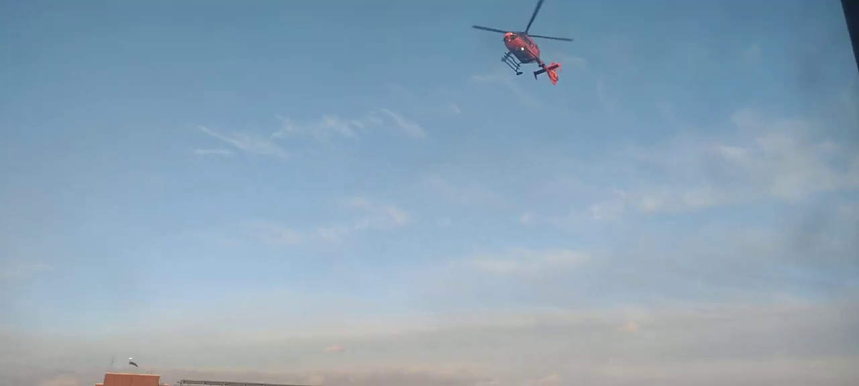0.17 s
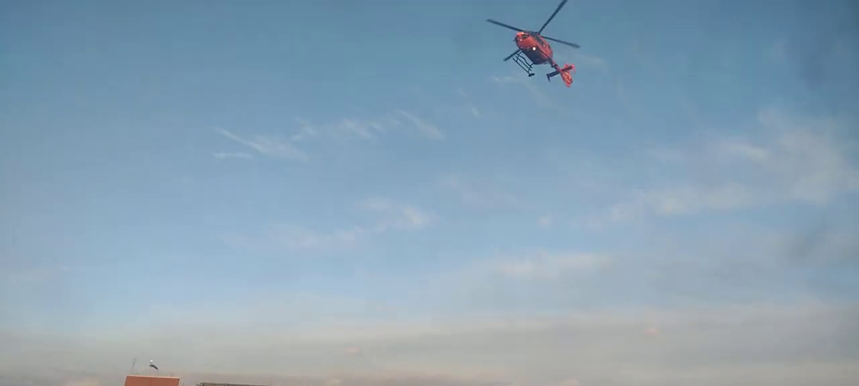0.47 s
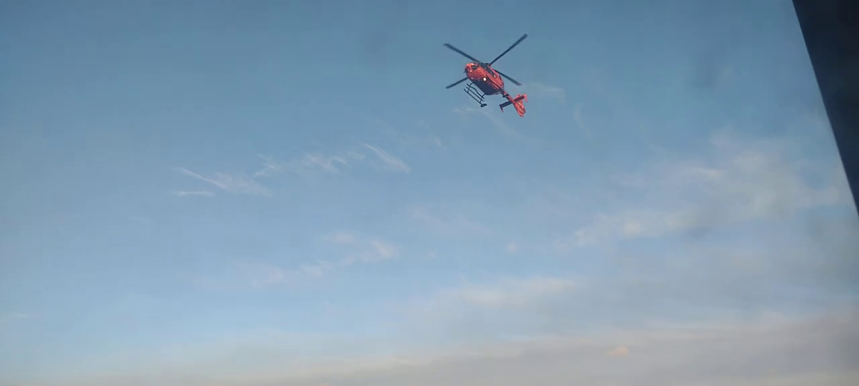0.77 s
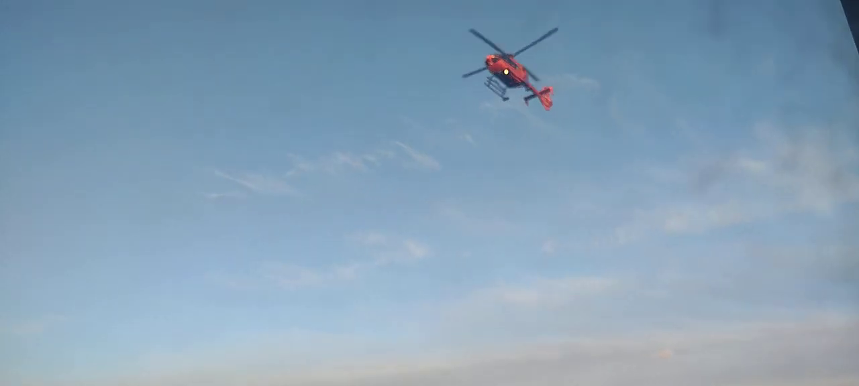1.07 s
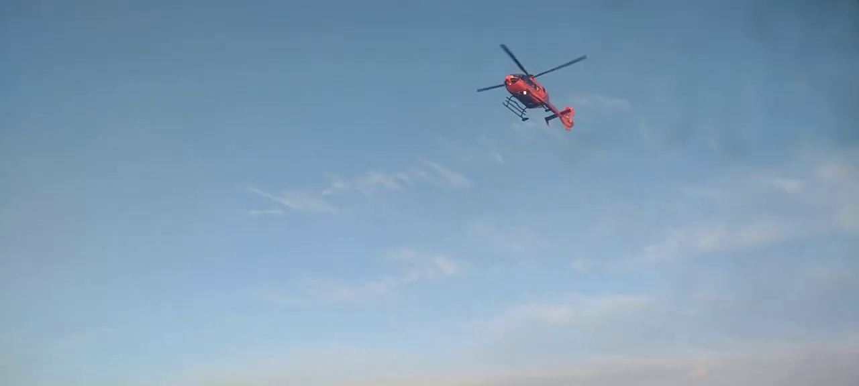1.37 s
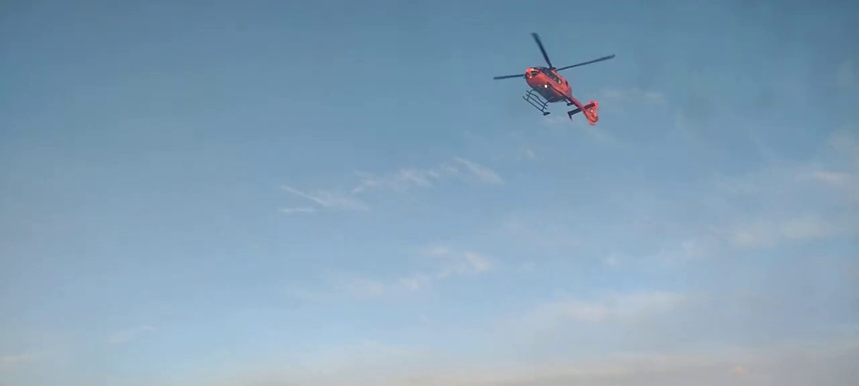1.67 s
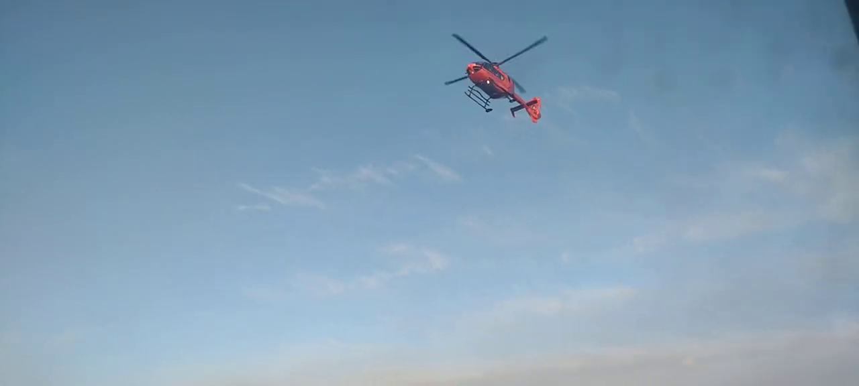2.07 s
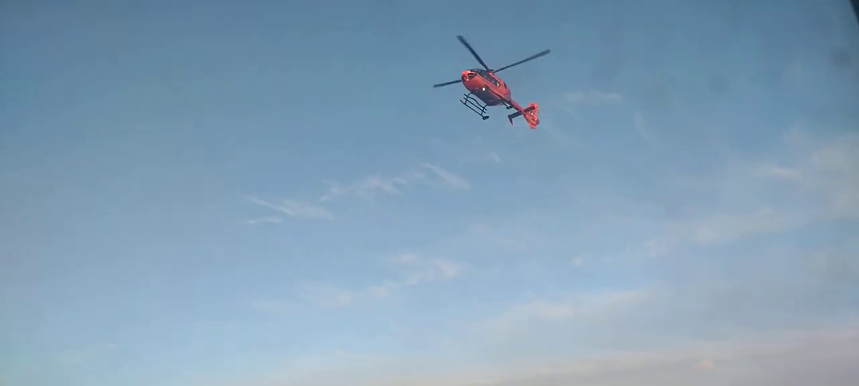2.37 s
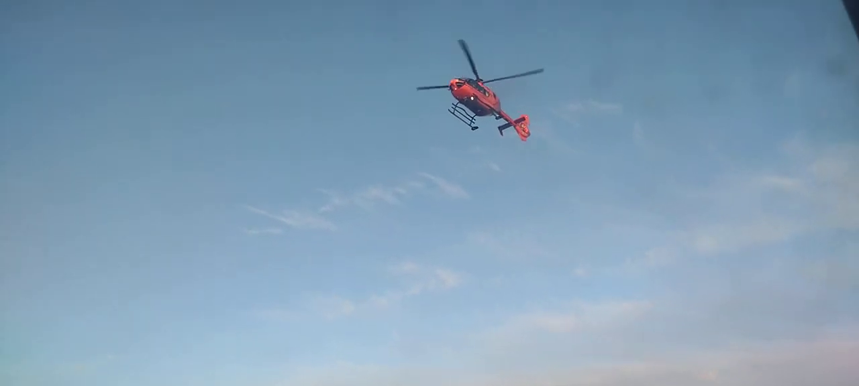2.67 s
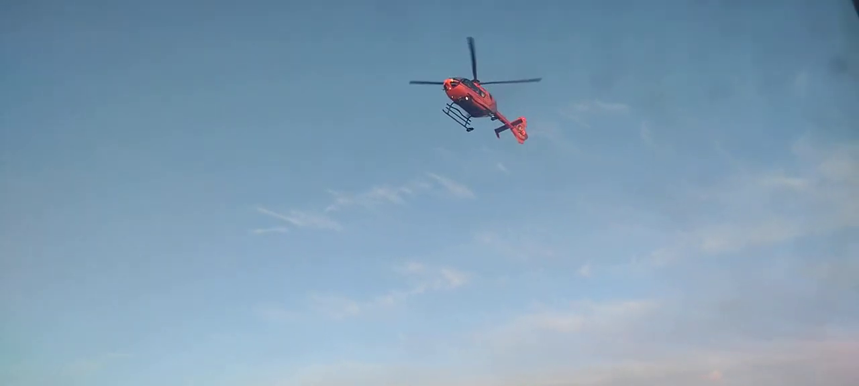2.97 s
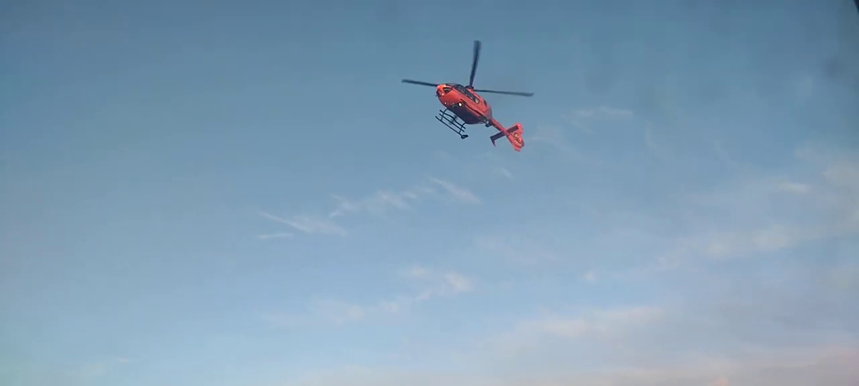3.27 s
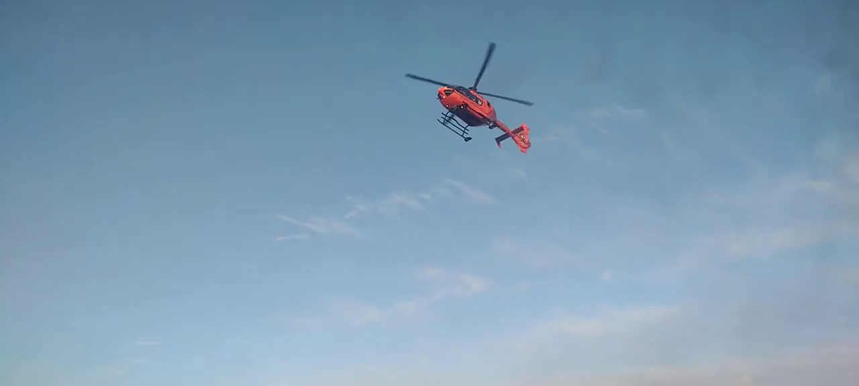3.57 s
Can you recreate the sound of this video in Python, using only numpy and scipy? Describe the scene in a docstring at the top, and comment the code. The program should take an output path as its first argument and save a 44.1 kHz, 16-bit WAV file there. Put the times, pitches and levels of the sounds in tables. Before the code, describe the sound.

A helicopter's fast blade chop and rushing downwash roar, with faint clicks of handling

```python
"""Helicopter hovering overhead

A four-bladed rotor radiates a low throb, a sum of harmonics of the blade-passing frequency.
Filtered noise makes the downwash roar, which swishes with the blades; tone and noise bursts make the slaps.
Faint gear tones and a sagging hum are sines; a delayed copy of roar and slaps is the ground echo.
A hand scuffs, clicks and bumps the microphone, and air buffets it: enveloped noise and a damped sine."""
import sys
import numpy as np
from scipy import signal
from scipy.fft import rfft, irfft
from scipy.io import wavfile
from scipy.ndimage import uniform_filter1d

SR = 44100
rng = np.random.default_rng(int(sys.argv[2]) if len(sys.argv) > 2 else 0)


def dump_mix(stems):
    """Bounce the given channels to the path in sys.argv[1] as a 16-bit WAV at rate SR."""
    frames = np.atleast_2d(stems).T  # one column per channel
    limited = np.clip(frames, -1, 1)  # hard clip at full scale
    pcm = np.round(limited * 32767).astype(np.int16)
    wavfile.write(sys.argv[1], SR, pcm)


N = 164052
T = np.arange(N) / SR   # time axis in s

BLADE_HZ = 27.65   # blade-passing frequency
GRAIN_HZ = 70      # rate of the fast roughness of scuffs and roar

# Swing of the turbulence in four bands, used relative to each column's mean:
# [t/s, low level/dB, lower middle level/dB, upper middle level/dB, treble level/dB]
ROAR_SWING = [(0.0, -27, -30, -27.5, -38), (0.4, -26, -25.5, -27, -37), (0.8, -21.5, -22.5, -25, -37),
              (1.0, -23.0, -25.5, -27, -39.5), (1.15, -20, -25.5, -28, -36.5),
              (1.33, -17, -24, -28.5, -39.5), (1.5, -21, -25, -26.5, -37.5), (1.75, -19, -23.5, -17.5, -38),
              (1.97, -23.5, -24.5, -25, -36.5), (2.1, -18.5, -22.5, -23, -36.5),
              (2.4, -23, -25.5, -27, -38), (2.6, -21, -25, -23.5, -35.5), (2.9, -21, -24.5, -25.5, -37),
              (3.22, -22, -22.5, -26, -35), (3.35, -19.5, -23.5, -26.5, -39),
              (3.55, -16, -26.5, -24.5, -35.5), (3.72, -23, -22, -25.5, -37)]


def from_db(db):
    """Level to amplitude: 20 dB is a factor of ten."""
    return 10 ** (np.asarray(db) / 20)


def rms_one(x):
    """Normalization to unit mean-square power."""
    return x / np.sqrt(np.mean(x ** 2) + 1e-20)


def in_time(rows):
    """Linear interpolation of each column of a time table to every sample."""
    s, *columns = np.transpose(rows)
    return [np.interp(T, s, column) for column in columns]


def swing_db():
    """Level fluctuation of each roar band about its time average, in dB."""
    return [db - db.mean() for db in in_time(ROAR_SWING)]


def drift(rate_hz):
    """Random modulation of unit spread: white noise through a double-pole low-pass."""
    step = 40   # samples between computed points
    pole = np.exp(-2 * np.pi * rate_hz * step / SR)
    white = rng.standard_normal(N // step + 2002)
    slow = signal.lfilter([1], [1, -2 * pole, pole * pole], white)[2000:]   # settled part
    return np.interp(np.arange(N) / step, np.arange(len(slow)), rms_one(slow))


def noise(colour):
    """Gaussian noise of unit power, shaped by a spectrum within 18-9000 Hz."""
    hz, db = np.transpose(colour)
    bins = np.maximum(np.arange(N // 2 + 1) * SR / N, 1)
    gain = from_db(np.interp(np.log(bins), np.log(hz), db))
    gain = gain * (bins > 18) * (bins < 9000)
    return rms_one(irfft(rfft(rng.standard_normal(N)) * gain, N))


def steady_noise(colour):
    """Envelope equalization: noise over its running RMS gives short bursts a dependable strength."""
    air = noise(colour)
    return air / np.sqrt(uniform_filter1d(air ** 2, size=200) + 1e-9)


def burst(s, rise, decay):
    """Transient envelope: Gaussian rise to a peak of 1 at s, then exponential decay."""
    exponent = np.where(T < s, ((T - s) / rise) ** 2, (T - s) / decay)
    return np.exp(-np.minimum(exponent, 60))


def handling():
    """Contact and flow noise at the microphone: enveloped noise, and a damped oscillation for the bump."""
    # Fingers scuff the casing: [peak t/s, rise t/s, decay t/s, level before grain/dB]
    scuff_events = [(0.552, 0.0036, 0.04, -35), (1.677, .005, 0.033, -32.5), (1.762, 0.043, 0.071, -36.5),
                    (1.891, .005, 0.079, -34.5)]
    # Scuff spectrum: [f/Hz, relative level/dB]
    scuff_colour = [(400, -13.5), (1400, -17.5), (2500, -1.5), (4000, 3), (5500, -5), (8000, -7)]
    # Sharp clicks on the casing: [peak t/s, level/dB]
    click_events = [(.693, -16.5), (.983, -35), (1.653, -28)]
    # Click spectrum: [f/Hz, relative level/dB]
    click_colour = [(1500, -29), (3500, -15), (4500, 1.5), (7500, -3.5), (9000, 3)]
    # Air buffets the microphone: [peak t/s, decay t/s, level/dB]
    buffet_events = [(.425, 0.02, -20.5), (.56, .03, -26), (2.035, 0.072, -17.5), (2.351, 0.041, -34)]
    # Buffet and breeze spectrum: [f/Hz, relative level/dB]
    buffet_colour = [(20, 1), (60, 2.5), (110, -0.5), (200, -8.5), (500, -39), (2000, -74.5)]
    click_decay_s, buffet_rise_s, breeze_db = 0.00038, 0.011, -34.5
    bump_s, bump_hz, bump_db, bump_decay_s = 2.0565, 123, -11, 0.011

    scuff_envelope = sum(from_db(db) * burst(s, rise, decay) for s, rise, decay, db in scuff_events)
    grain_db = 1 * np.tanh(drift(GRAIN_HZ))
    scuffs = noise(scuff_colour) * scuff_envelope * from_db(grain_db)

    click_envelope = sum(from_db(db) * burst(s, click_decay_s, click_decay_s) for s, db in click_events)
    clicks = steady_noise(click_colour) * click_envelope

    since = np.maximum(T - bump_s, 0)
    bump = -from_db(bump_db) * np.sin(2 * np.pi * bump_hz * since) * np.exp(-since / bump_decay_s)

    puff_envelope = sum(from_db(db) * burst(s, buffet_rise_s, decay) for s, decay, db in buffet_events)
    puffs = noise(buffet_colour) * (from_db(breeze_db) + puff_envelope)
    return scuffs + clicks + bump + puffs


def sagging_hum():
    """Frequency modulation: phase is the integral of a sagging frequency, under a swelling level."""
    # Course of the hum: [t/s, f/Hz, level before waver/dB]
    hum_course = [(0, 279, -39.5), (1.0, 280, -38.5), (1.6, 278, -29.5), (2.2, 276, -24.5),
                  (2.6, 274.5, -29), (2.95, 271, -37.5), (3.2, 266, -31.5), (3.45, 253, -29),
                  (3.72, 248, -39)]
    waver_db = 1.5
    hz, db = in_time(hum_course)
    phase = 2 * np.pi * np.cumsum(hz) / SR
    return np.sqrt(2) * from_db(db + waver_db * drift(7.7)) * np.sin(phase)


def gearbox():
    """Gear tones: sines with slow random amplitude and frequency modulation."""
    # Centre of each tone: [f/Hz, level/dB]
    gear_tones = [(230, -36), (256, -36), (1042, -45), (1289, -44.5)]
    waver_db, wander_hz = 4, 2.65
    out = 0
    for hz, db in gear_tones:
        level = from_db(db + waver_db * np.tanh(drift(5.6)))
        phase = 2 * np.pi * np.cumsum(hz + wander_hz * drift(5.8)) / SR
        out = out + level * np.sin(phase)
    return np.sqrt(2) * out


def with_ground(x):
    """Specular reflection: direct sound plus a delayed, weaker copy, scaled by their summed power."""
    echo_s, echo_share = 0.0136, 0.16   # delay, amplitude relative to the direct sound
    echo = np.interp(T - echo_s, T, x, left=0)
    return (x + echo_share * echo) / np.hypot(1, echo_share)


def roar():
    """Broadband turbulence of rotor and exhaust, amplitude-modulated at the blade-passing frequency."""
    # Noise spectrum: [f/Hz, relative level/dB]
    roar_colour = [(30, 1), (70, 1.5), (120, -8), (170, -2.5), (240, -1), (310, -0.5), (380, 0.5),
                   (450, 0.5), (600, 1.5), (780, -1.5), (950, -4.5), (1400, -6), (1700, -7.5), (2150, -9),
                   (2550, -15.5), (3100, -20), (3900, -19), (4600, -25), (5400, -30), (7500, -32.5)]
    # Centres of the four swing bands, low to treble: [f/Hz]
    centres_hz = (300, 720, 1400, 3800)
    # Blade swish in the same bands, peak deviation: [level/dB]
    swish_depths = (2.4, 1.3, 0.51, 0.25)
    roar_db, follows, patchy_db, grain_db = -24, 0.82, 0.89, 1.55
    swish_at_s = 0.023   # a crest of the swish

    spectrum = rfft(noise(roar_colour))
    bins = np.arange(N // 2 + 1) * SR / N
    swings = swing_db()
    swish = np.cos(2 * np.pi * BLADE_HZ * (T - swish_at_s))
    edges = np.geomspace(18, 9000, 19)
    out = 0
    for low, high in zip(edges, edges[1:]):
        # place of this band on the 0-3 scale of the swing bands
        place = np.interp(np.log(low * high) / 2, np.log(centres_hz), np.arange(len(swings)))
        slow_db = sum(max(0, 1 - abs(place - i)) * db for i, db in enumerate(swings))
        depth_db = np.interp(place, np.arange(len(swings)), swish_depths)
        band = irfft(spectrum * (bins >= low) * (bins < high), N)
        flicker_db = patchy_db * drift(6.3)   # each band by itself
        out = out + band * from_db(roar_db + follows * slow_db + depth_db * swish + flicker_db)
    return out * from_db(grain_db * np.tanh(drift(GRAIN_HZ)))


def knock(s, hz):
    """Damped resonance: a few cycles of a hollow tone."""
    rise_s, decay_s = 0.0032, 0.0027
    return np.sin(2 * np.pi * hz * (T - s)) * burst(s, rise_s, decay_s)


def crack_envelope(s):
    """Impulsive noise envelope, peaking shortly after the knock."""
    lag_s, rise_s, decay_s = 0.0017, 0.0021, 0.013
    return burst(s + lag_s, rise_s, decay_s)


def blade_slap():
    """Blade-wake interaction: each passage makes a knock and a crack; some blades strike a vortex hard."""
    # Hard slaps: [t/s, knock f/Hz, knock level/dB, crack level before low-pass/dB, low-pass f/Hz]
    hard_slaps = [(.1595, 740, -19.5, -28, 2500), (.1955, 730, -18, -28, 2500),
                  (.268, 730, -17.5, -31, 2500), (.662, 740, -12, -29, 2500),
                  (.7336, 706, -14.5, -21, 2500), (.8067, 720, -15, -17.5, 3000),
                  (.8417, 784, -11.5, -18, 3000), (1.0958, 760, -13, -20.5, 5000),
                  (1.1329, 714, -16.5, -18.5, 2800), (1.3135, 760, -18, -26, 1600),
                  (1.4223, 770, -13, -19, 2800), (1.457, 770, -9, -19, 1600), (1.4952, 770, -15, -30, 1600),
                  (1.564, 775, -10.5, -22, 2500), (1.6389, 790, -12.5, -29, 1600),
                  (1.6728, 740, -9, -15.5, 3500), (1.7464, 825, -10.5, -18, 2000),
                  (1.7832, 800, -17, -24, 2000), (1.8911, 810, -11, -13.5, 3500),
                  (2.0367, 790, -9.5, -18.5, 2000), (2.1441, 680, -12, -18, 2500),
                  (2.6162, 720, -11, -17.5, 6000), (2.7601, 735, -19, -20.5, 3000),
                  (2.9038, 740, -21, -20.5, 2000), (3.0132, 740, -18, -22.5, 2000),
                  (3.1227, 740, -18, -23, 3000), (3.3038, 800, -17, -18.5, 1500),
                  (3.3321, 730, -16.5, -22, 1700), (3.3736, 650, -19, -13, 1300),
                  (3.4125, 724, -16, -19, 1500), (3.4475, 740, -18, -16, 1300),
                  (3.481, 725, -22, -17, 1500), (3.517, 720, -14.5, -15, 1400),
                  (3.5538, 750, -21, -19, 4000), (3.702, 754, -20, -18, 1800)]
    # Crack spectrum: [f/Hz, relative level/dB]
    crack_colour = [(450, 0.5), (1000, 7), (1400, 6.5), (1750, -1), (2150, 2), (2900, -13), (4000, -7.5),
                    (5400, -24), (8000, -32)]
    chop_at_s, jitter_s = 0.01, 0.00082   # first ordinary chop, timing spread
    chop_hz, pitch_spread_oct = 738, 0.083
    chop_db, chop_crack_db, spread_db = -20.5, -29, 3
    fade_db_per_s = 0.6   # the chopping eases as the helicopter nears
    follows = 0.75        # share of the roar's swing that ordinary chops follow

    _, body_db, crack_swing_db, _ = [follows * db for db in swing_db()]
    passes = chop_at_s + np.arange(int(N / SR * BLADE_HZ) + 1) / BLADE_HZ
    knocks, cracks = 0, 0
    for s, (strength, late, pitch) in zip(passes, rng.standard_normal((len(passes), 3))):
        # a hard slap takes the place of an ordinary chop
        if min(abs(s - slap[0]) for slap in hard_slaps) < 0.5 / BLADE_HZ:
            continue
        gain = from_db(spread_db * np.tanh(strength) - fade_db_per_s * s)
        at_s = s + jitter_s * late
        knocks = knocks + gain * knock(at_s, chop_hz * 2 ** (pitch_spread_oct * pitch))
        cracks = cracks + gain * crack_envelope(at_s)
    knocks = knocks * from_db(chop_db + body_db)
    cracks = cracks * from_db(chop_crack_db + crack_swing_db)

    hiss = steady_noise(crack_colour)
    out = knocks + cracks * hiss
    for s, hz, knock_db, crack_db, top_hz in hard_slaps:
        crack = from_db(crack_db) * hiss * crack_envelope(s)
        dulled = signal.lfilter(*signal.butter(2, top_hz, fs=SR), crack)
        out = out + from_db(knock_db) * knock(s, hz) + dulled
    return out


def throb():
    """Rotor harmonics: a periodic suction pulse as a Fourier series, wavering on its way through the air."""
    # Strong multiples of the blade-passing frequency: [order]
    strong_orders = (1, 2, 3, 5, 10)
    # They fade in and out with the path, before trim and flutter:
    # [t/s, order 1 level/dB, order 2 level/dB, order 3 level/dB, order 5 level/dB, order 10 level/dB]
    strong_levels = [(0.0, -43, -25, -24, -64, -43), (0.3, -44, -21, -23.5, -62, -34),
                     (0.55, -28, -23, -23, -40, -35), (0.799, -23, -27, -22, -36, -44),
                     (1.0, -23.5, -25.5, -24, -31.5, -30.5), (1.2, -29, -28, -23.5, -31.5, -39.5),
                     (1.449, -31, -28, -20.5, -26.5, -29), (1.701, -27.5, -30.5, -24.0, -27, -45),
                     (1.95, -27.5, -32, -25.5, -33, -39.5), (2.15, -32, -27, -22, -33.5, -43),
                     (2.4, -26, -21.5, -22.5, -26.5, -35), (2.65, -22, -30, -21, -27.5, -33),
                     (2.9, -25.5, -27.5, -20.5, -29, -29.5), (3.2, -26.5, -28, -21, -31, -32),
                     (3.399, -25, -35, -17.5, -25.5, -40), (3.72, -27, -25, -19.5, -27.0, -38)]
    # Weak multiples, before the roar's low-band swing: [order, level/dB]
    weak_orders = [(4, -38), (6, -39.5), (7, -37), (8, -35), (9, -35), (12, -41.5), (13, -40), (14, -40),
                   (20, -38.5), (22, -44.5), (24, -42.5)]
    throb_at_s, travel_waver_s = 0.01209, 0.00052   # pulse position, wander of the travel time
    trim_db, skew_rad = -0.04, 0.69                 # the skew makes the pulse lopsided
    flutter_db, flutter_rad = 0.3536, 0.0083        # per order: high orders flutter most
    weak_waver_rad = 0.54

    turn = 2 * np.pi * BLADE_HZ * (T - throb_at_s + travel_waver_s * drift(1.24))
    out = 0
    for k, db in zip(strong_orders, in_time(strong_levels)):
        level = from_db(db + trim_db + flutter_db * k * drift(5.1))
        phase = k * (turn + flutter_rad * drift(6.7)) - skew_rad
        out = out - level * np.cos(phase)
    low_swing_db = swing_db()[0]
    for k, db in weak_orders:
        phase = k * turn + rng.uniform(0, 2 * np.pi) + weak_waver_rad * drift(5)
        out = out - from_db(db + low_swing_db) * np.cos(phase)
    return np.sqrt(2) * out


def scene():
    """Superposition of the hand at the microphone and the helicopter above, in one channel."""
    tones = sagging_hum() + gearbox() + throb()
    return (handling() + tones + with_ground(roar() + blade_slap()))[None]


def record(dry):
    """Band limitation: a narrow-band recorder cuts the top with a steep elliptic low-pass."""
    cutoff_hz = 7650
    return signal.sosfilt(signal.ellip(10, .2, 90, cutoff_hz, fs=SR, output="sos"), dry)


dry = scene()
out = record(dry)
dump_mix(out)
```